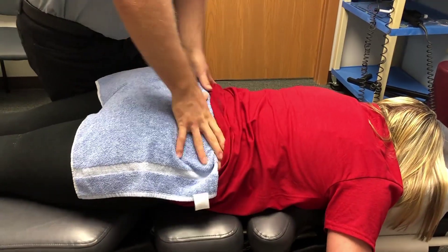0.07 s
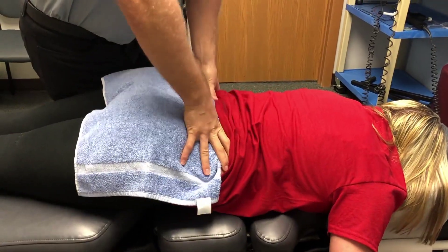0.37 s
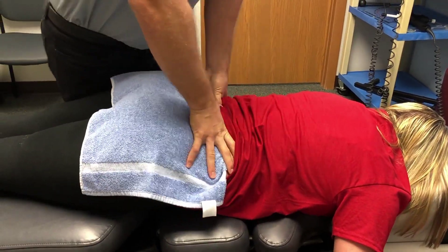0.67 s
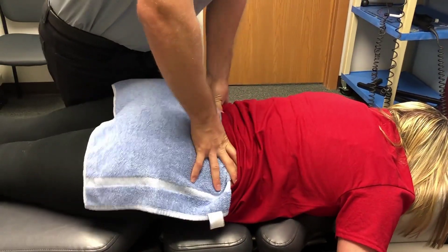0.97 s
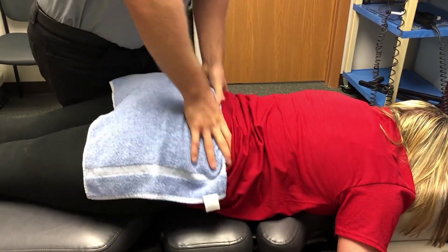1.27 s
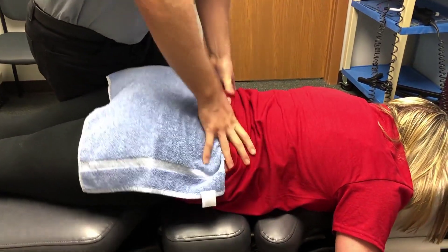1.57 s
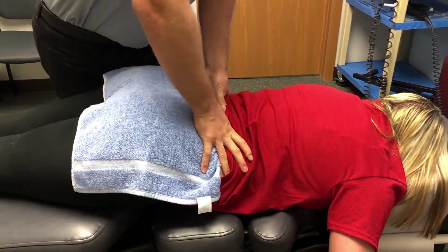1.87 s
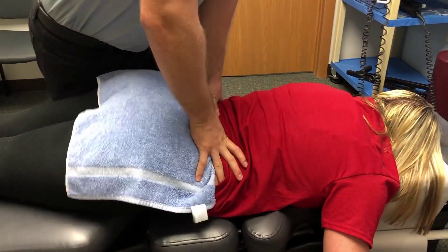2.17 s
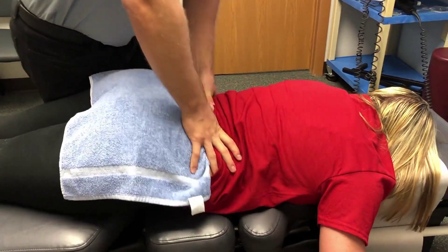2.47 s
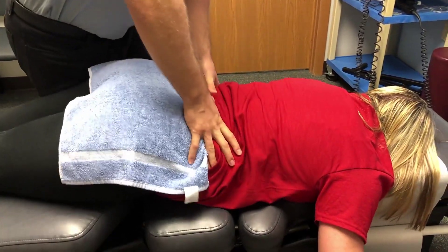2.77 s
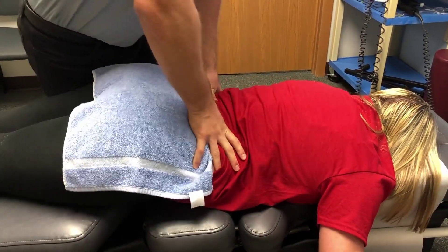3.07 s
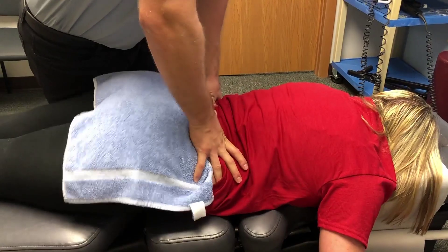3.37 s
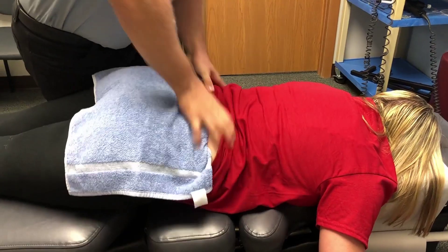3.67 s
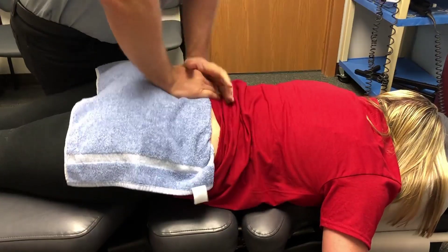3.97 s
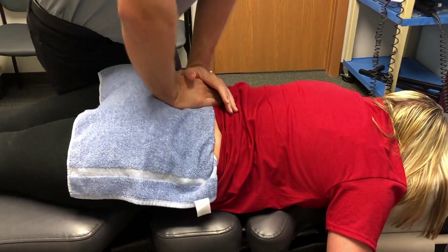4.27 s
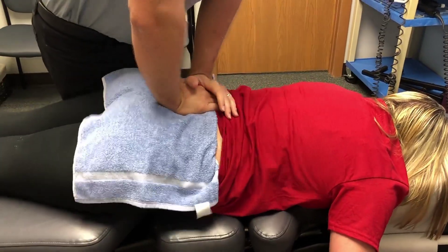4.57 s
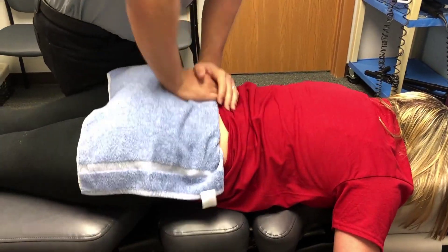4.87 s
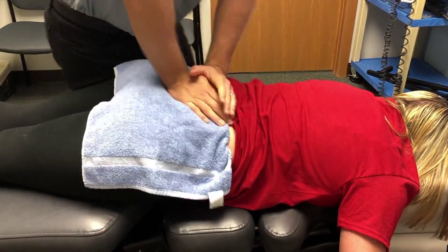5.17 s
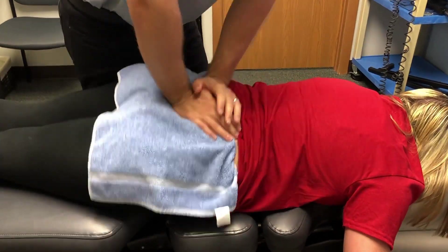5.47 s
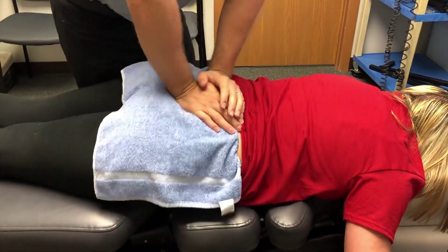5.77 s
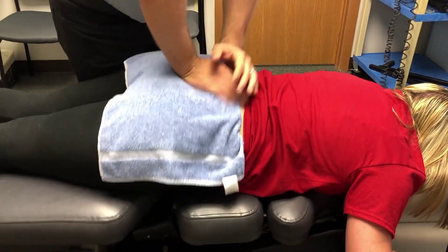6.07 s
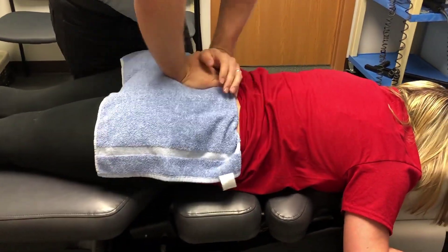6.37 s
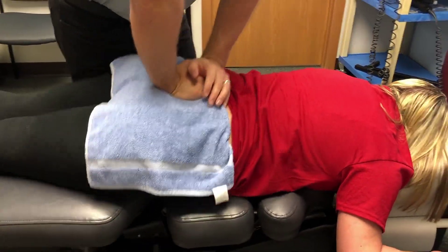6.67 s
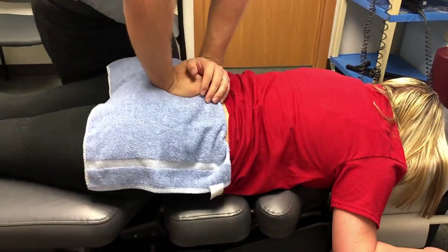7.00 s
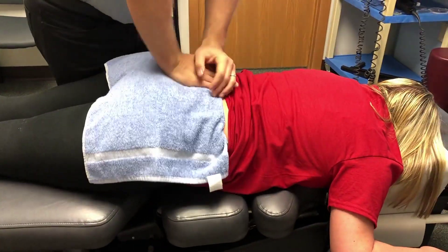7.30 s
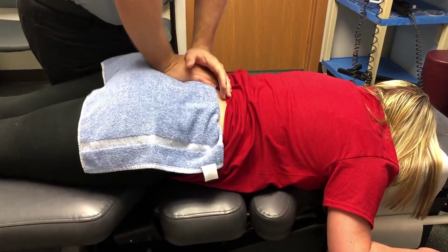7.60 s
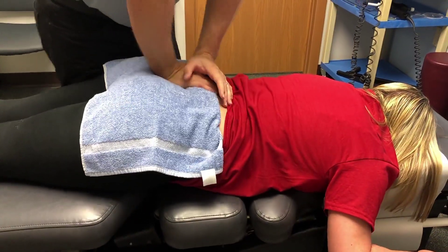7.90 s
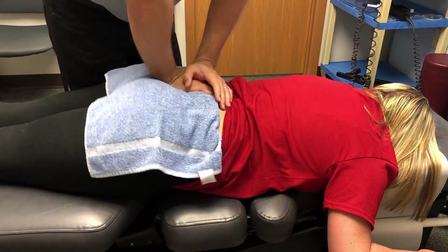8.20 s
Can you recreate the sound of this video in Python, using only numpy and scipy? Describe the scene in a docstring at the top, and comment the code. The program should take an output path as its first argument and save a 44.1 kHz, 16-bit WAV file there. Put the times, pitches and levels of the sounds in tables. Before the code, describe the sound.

In a small quiet office, an air-driven treatment table works seven times, about once a second, close to the microphone. Each time a valve clicks and the padded section knocks up against its stop. Air escapes in a short hiss with falling whistles, then a hand thrust trips the latch and the section drops with a clack and a heavy thud. Light ticks fall between the blows, and ventilation hums faintly.

```python
"""An air-driven drop table works seven times in a small quiet office.
Each time a valve clicks and a piston knocks the padded section up against its stop.
The air hisses out with falling whistles and the piston settles. A thrust of the hands then trips
the latch and the section thuds down on the frame. The controls tick now and then between the blows;
ventilation hums throughout."""
import sys
import numpy as np
from scipy import signal
from scipy.fft import rfft, irfft
from scipy.io import wavfile
from scipy.ndimage import uniform_filter1d, minimum_filter1d

SR = 44100
rng = np.random.default_rng(int(sys.argv[2]) if len(sys.argv) > 2 else 0)


def put_to_file(sound):
    """Save the sound as 16-bit audio at rate SR, in the file named by the first command-line argument."""
    columns = np.atleast_2d(sound).T  # one column per channel
    safe = np.clip(columns, -1, 1)
    whole_steps = np.round(safe * 32767)
    wavfile.write(sys.argv[1], SR, whole_steps.astype(np.int16))


N = 367794
CUTOFF_HZ = 15600
CLOCK_S = np.arange(N) / SR
AGE_S = np.arange(int(.7 * SR)) / SR   # time within one event
RIPPLE = rng.standard_normal(400)   # nearby hard surfaces give all noises the same fine peaks and dips

# piston modes: f/Hz, level/dB, t60/s
PISTON_MODES = [(363, -9, 0.14), (528, 2, 0.037), (998, -2, 0.025), (1280, -13, 0.016), (4240, -23, 0.071)]
# piston clatter spectrum: f/Hz, level/dB
PISTON_SPECTRUM = [(47, -34), (80, -7.5), (145, -2), (250, -16), (365, -1.5), (550, -2.5), (720, -7),
                   (1400, -11.5), (2000, -17.5), (5000, -23.5), (15500, -43)]
# latch and control clatter spectrum: f/Hz, level/dB
LATCH_SPECTRUM = [(30, -16), (100, -19.5), (170, -6.5), (380, -0.5), (700, -2.5), (1300, -10.5),
                  (2200, -11.5), (5200, -13.5), (7000, -16.5), (9500, -21.5), (12000, -24), (15500, -26)]
# spectrum of slow air through the silencer: f/Hz, level/dB
SILENCER_SPECTRUM = [(150, -4), (500, -32), (1500, -10), (3000, -7), (4000, 3.5), (6200, 3), (9300, 1.5),
                     (10200, -14), (11200, -6), (11700, -2), (12600, -17), (15400, -8)]


def raising():
    """The valve clicks; the piston meets the cushion and knocks it up to its stop."""
    # valve t/s, valve treble/dB, piston contact t/s, piston treble/dB, stop t/s
    raises = [(.1094, 1.5, .228, -1, .2845), (1.4706, 3.5, 1.591, .5, 1.6408),
              (2.562, 1.5, 2.6914, 1, 2.7305), (3.7405, 1, 3.8627, .5, 3.920),
              (4.811, 0, 4.9635, 4, 4.9945), (6.0095, -.5, 6.1337, -.5, 6.188),
              (7.371, .5, 7.499, -3.5, 7.5498)]
    # contact modes: f/Hz, level/dB, t60/s
    valve_modes = [(374, 9.5, 0.023), (529, -3, 0.034), (2500, 10, 0.0067), (3256, -7, 0.028),
                   (4470, -1.5, 0.014), (4850, 3, 0.014)]
    stop_modes = [(398, 4.5, 0.04), (694, -10.5, 0.047), (793, -22, 0.19), (917, -4.5, 0.074),
                  (1214, -5.5, 0.053), (1310, -18.5, 0.34), (1590, -5, 0.021), (1580, -17.5, 0.21),
                  (2520, -7.5, .02), (3416, -10, 0.075), (4153, -0.5, 0.026), (4300, -23, 0.1)]
    # clatter spectra: f/Hz, level/dB
    valve_spectrum = [(47, -53.5), (140, -10.5), (180, -13), (360, -1.5), (550, -4.5), (800, -8.5),
                      (1700, -11.5), (2100, -19), (5600, -18.5), (6900, -21.5), (8700, -23.5), (15500, -31)]
    stop_spectrum = [(30, -24), (90, -25.5), (150, -3), (370, -4), (620, -2), (1250, -6), (1650, -9),
                     (2000, -16), (3200, -16.5), (4200, -14.5), (4900, -23.5), (9000, -28.5), (12000, -31),
                     (15500, -39.5)]
    valve_s, valve_treble_db, lift_s, lift_treble_db, stop_s = np.transpose(raises)
    valve = blows(strikes(valve_s, level_db=-14, treble_db=valve_treble_db), valve_spectrum, valve_modes,
                  crack_db=-8.5, crack_s=.0045, crack_treble_db=10, attack_s=.0019,
                  room_db=-5.5, early_db=-11, echo_db=-8, frame_db=-10)
    lift = blows(strikes(lift_s, level_db=-12.3, treble_db=lift_treble_db),
                 PISTON_SPECTRUM, PISTON_MODES,
                 crack_db=-5, crack_s=.005, crack_treble_db=7.5, attack_s=.0017,
                 room_db=-10, early_db=2, echo_db=-10.5, frame_db=-5)
    stop = blows(strikes(stop_s, level_db=-9, treble_db=0), stop_spectrum, stop_modes,
                 crack_db=-15.5, crack_s=.0056, crack_treble_db=19.5, attack_s=.0002,
                 room_db=-2.5, early_db=-5, echo_db=-10.5, frame_db=-2)
    return valve + lift + stop


def dropping(push_lead_s=.026, strain_lead_s=.015, bump_lag_s=.023, full_thud_db=-8):
    """Hands push; the latch strains and trips; a dull bump follows its clack; the section lands."""
    # push/dB, trip t/s, latch/dB, latch treble/dB, bump/dB, landing t/s, landing/dB
    drops = [(-45, .908, -4.5, -.5, -15, 0.95, -12), (-52, 2.205, -11, 1, -17.5, 2.285, -11),
             (-46, 3.305, -8.5, -4.5, -17.5, 3.365, -8.5), (-46, 4.470, -11, .5, -25, 4.490, -11.5),
             (-44, 5.526, -10.5, -6, -24, 5.551, -6.5), (-40, 6.742, -14, -7, -28, 6.744, -6.5),
             (-38, 8.1305, -13.5, 4.5, -10, 8.12, -11)]
    # second latch clack on slow drops: t/s, level/dB
    rebounds = [(2.261, -16.5), (3.374, -10.5)]
    # contact modes: f/Hz, level/dB, t60/s
    latch_modes = [(426, -4, 0.023), (660, -6, .02), (3760, 0.5, 0.028), (4720, 6, 0.011),
                   (5240, 3.5, 0.013), (5600, -15, 0.11)]
    thud_modes = [(147.5, 2.5, 0.073), (249, -3, 0.1), (382, 4, 0.031), (484, 3, 0.023)]
    # thud spectrum: f/Hz, level/dB
    thud_spectrum = [(25, -28), (75, -17.5), (140, -1.5), (200, -2), (370, -2), (600, -7.5), (1200, -13),
                     (2200, -21), (5000, -26), (15500, -34)]
    push_db, trip_s, latch_db, latch_treble_db, bump_db, landing_s, landing_db = np.transpose(drops)
    rebound_s, rebound_db = np.transpose(rebounds)
    contact_s = np.minimum(trip_s, landing_s)
    clacks = np.vstack([strikes(contact_s - strain_lead_s, level_db=-24, treble_db=-8),
                        strikes(trip_s, latch_db, latch_treble_db),
                        strikes(rebound_s, rebound_db, treble_db=-5.5)])
    latch = blows(clacks, LATCH_SPECTRUM, latch_modes,
                  crack_db=-5, crack_s=.0041, crack_treble_db=10, attack_s=.0012,
                  room_db=-4.5, early_db=3.5, echo_db=-11, frame_db=-8.5)
    thud_s = np.r_[contact_s - push_lead_s, trip_s + bump_lag_s, landing_s]
    thud_db = np.r_[push_db, bump_db, landing_db]
    thud_treble_db = .38 * (full_thud_db - thud_db)   # lighter thuds are thinner
    thud = blows(strikes(thud_s, thud_db, thud_treble_db), thud_spectrum, thud_modes,
                 crack_db=-6.5, crack_s=.007, crack_treble_db=-2.5, attack_s=.00046,
                 room_db=-6.5, early_db=2.5, echo_db=-16.5, frame_db=-5, corner_hz=304)
    return latch + thud


def venting():
    """The cylinder empties, its piston settles with a soft knock, a seep lingers."""
    # vent opening t/s, settling delay/s, settling level/dB
    vents = [(.561, .064, -27.5), (1.924, .065, -33), (2.934, .067, -29), (4.192, .046, -27.5),
             (5.202, .059, -28), (6.462, .035, -29.5), (7.823, .029, -33)]
    vent_s, delay_s, settle_db = np.transpose(vents)
    settle = blows(strikes(vent_s + delay_s, settle_db, treble_db=-1), PISTON_SPECTRUM, PISTON_MODES[2:],
                   crack_db=-3, crack_s=.011, crack_treble_db=13, attack_s=.0054,
                   room_db=-2.5, early_db=0, echo_db=-17, frame_db=-1)
    return exhaust(vent_s) + settle + seep(vent_s)


def exhaust(vent_s, level_db=-21.5, hold_s=.08, pressure_s=.16, leak_lead_s=.0078):
    """The valve leaks, then opens; the jet holds, then fades, its whistles falling with the pressure."""
    # air jet spectrum: f/Hz, level/dB
    jet_spectrum = [(47, -24), (150, 13), (350, 2), (600, -7), (950, -7), (1500, -9.5), (2300, 3.5),
                    (3100, 1), (4300, 1.5), (6700, 8), (8700, 7.5), (10500, 3), (13000, 3.5), (15500, 5)]
    track = np.zeros(N)
    flow = rising(.0019) / np.sqrt(1 + (AGE_S / hold_s) ** 3.76) * dying(3.56)
    slack = rising(.23)   # at low pressure only the silencer's colour is left
    lower_hz = 15600 * np.exp(-AGE_S / pressure_s)
    upper_hz = 1.5 * lower_hz
    for start_s in vent_s:
        jet = coloured(rng.standard_normal(len(AGE_S)), jet_spectrum)
        muffled = coloured(rng.standard_normal(len(AGE_S)), SILENCER_SPECTRUM)
        hiss = np.sqrt(1 - slack) * jet + np.sqrt(slack) * muffled
        lower = from_db(-4) * whistle(lower_hz, half_width_hz=300)
        upper = from_db(-9) * whistle(upper_hz, half_width_hz=500) * (upper_hz < CUTOFF_HZ)
        whistles = (lower + upper) * dying(1.7)   # fade faster than the jet
        leak = from_db(-12.5) * jet * rising(.0057) * dying(.51)
        add(track, start_s, from_db(level_db) * flow * (hiss + whistles))
        add(track, start_s - leak_lead_s, from_db(level_db) * leak)
    return track


def whistle(pitch_hz, half_width_hz):
    """Breathy tone: a gliding sine times low-passed noise."""
    lowpass = signal.butter(2, half_width_hz, fs=SR, output="sos")
    waver = signal.sosfilt(lowpass, rng.standard_normal(len(AGE_S)))
    return unit_rms(waver) * np.sin(2 * np.pi * np.cumsum(pitch_hz) / SR)


def seep(vent_s, length_s=.7, level_db=-66.5):
    """Thin hiss of air seeping after each vent opens."""
    is_open = sum((CLOCK_S > start_s) & (CLOCK_S < start_s + length_s) for start_s in vent_s)
    flow = uniform_filter1d(1.0 * is_open, size=2000)
    return from_db(level_db) * flow * coloured(rng.standard_normal(N), SILENCER_SPECTRUM)


def controls():
    """Light ticks of the controls between the heavy blows."""
    # ticks: t/s, level/dB, treble/dB
    ticks = [(1.297, -37.5, -6), (1.3574, -36.5, 11.5), (3.222, -29, -5), (3.6906, -33.5, 10.5),
             (4.725, -43, 0), (5.903, -35, -12), (7.111, -35, -8)]
    # control modes: f/Hz, level/dB, t60/s
    tick_modes = [(2340, 1.5, 0.019), (4740, -6, .015), (7170, -28, 0.17), (11700, -29, 0.16)]
    return blows(ticks, LATCH_SPECTRUM, tick_modes,
                 crack_db=-12.5, crack_s=.0098, crack_treble_db=9, attack_s=.0017,
                 room_db=-12.5, early_db=-8, echo_db=-14, frame_db=-16)


def ventilation(rumble_db=-50.5):
    """Steady air rumble with four fan tones."""
    # fan tones: f/Hz, rms level/dB
    fan_tones = [(58, -55.5), (465, -64), (552, -60), (941, -66)]
    # rumble spectrum: f/Hz, level/dB
    rumble_spectrum = [(25, -20), (40, -21), (56, -3.5), (85, -7.5), (130, -5.5), (220, -8), (340, -7.5),
                       (550, -8.5), (750, -21.5), (940, -17), (1500, -21), (2300, -27.5), (6000, -36.5),
                       (15500, -46)]
    hum = sum(from_db(db) * np.sqrt(2) * np.sin(2 * np.pi * (hz * CLOCK_S + rng.random()))
              for hz, db in fan_tones)
    return from_db(rumble_db) * coloured(rng.standard_normal(N), rumble_spectrum) + hum


def blows(rows, spectrum, modes, crack_db, crack_s, crack_treble_db, attack_s,
          room_db, early_db, echo_db, frame_db, corner_hz=1500, ceiling_s=.022, alike=.58):
    """Each blow: a few ms of chatter, the part's ring, a ceiling echo, then room and frame."""
    # table frame modes: f/Hz, level/dB before weighting by the blow's spectrum, t60/s
    frame_modes = [(62, -9, 0.38), (116, -24, 0.21), (141.24, -7.5, 0.48), (159.3, -15.5, 0.74),
                   (211, -13, 0.68), (251.4, -11.5, 0.59), (334, -10, 0.46), (365.2, -1.5, 0.3),
                   (444.5, -13, 0.51), (494.6, -3.5, 0.27), (545, -23.5, 0.29), (652, -13, 0.34),
                   (720, -37.5, 0.43), (789, -21, 0.37), (944, -8.5, 0.28), (1080, -4.5, 0.27),
                   (1213, -9, 0.32), (1490, -12, 0.19), (1610, -11.5, 0.37), (1816, -13, 0.18)]
    driven_modes = [(hz, db + at_hz(spectrum, hz), t60_s) for hz, db, t60_s in frame_modes]
    track = np.zeros(N)
    signature = rng.standard_normal(len(AGE_S))   # same parts, same spot: blows resemble one another
    # the room fills once the ceiling answers
    filling = np.interp(AGE_S, [.46 * ceiling_s, ceiling_s], [from_db(early_db), 1]) * rising(.0071)
    for start_s, level_db, treble_db in rows:
        white = np.sqrt(alike) * signature + np.sqrt(1 - alike) * rng.standard_normal(len(AGE_S))
        noise = coloured(white, spectrum)
        burst = np.exp(-(AGE_S / crack_s) ** 2) * rising(attack_s)
        crack = from_db(crack_db) * treble_shelf(noise, crack_treble_db) * burst
        contact = crack + ringing(modes, scatter_db=1.5, swell_s=attack_s)
        echo = from_db(echo_db) * np.interp(AGE_S - ceiling_s, AGE_S, contact, left=0)
        room = from_db(room_db) * room_tail(noise) * filling
        frame = from_db(frame_db) * ringing(driven_modes, scatter_db=-1, swell_s=.015)
        blow = treble_shelf(contact + echo + room + frame, treble_db, corner_hz)
        add(track, start_s, from_db(level_db) * blow)
    return track


def ringing(modes, scatter_db, swell_s, swell_cycles=1.16):
    """Decaying sines, low ones slower to build; level and phase vary per blow."""
    return sum(from_db(db + scatter_db * rng.normal()) * np.sin(2 * np.pi * (hz * AGE_S + rng.random()))
               * dying(t60_s) * rising(swell_s + swell_cycles / hz) for hz, db, t60_s in modes)


def room_tail(noise, hollow_db=-27.5, hollow_t60_s=.91):
    """Reflections die band by band, bass last; the hollow table rings on faintly."""
    # room decay: f/Hz, t60/s
    room_decay = [(60, 0.84), (150, 0.37), (350, 0.45), (700, 0.3), (1500, 0.28), (4000, 0.27),
                  (8000, 0.22), (15000, 0.19)]
    spectrum, hz = rfft(noise), np.fft.rfftfreq(len(noise), 1 / SR)
    centres_hz = np.transpose(room_decay)[0]
    walls = np.zeros(len(noise))
    for centre_hz, t60_s in room_decay:
        band = at_hz(np.c_[centres_hz, centres_hz == centre_hz], hz)
        walls += irfft(spectrum * band, len(noise)) * dying(t60_s)
    return walls + from_db(hollow_db) * noise[::-1] * dying(hollow_t60_s)


def strikes(times_s, level_db, treble_db):
    """Rows of t/s, level/dB, treble/dB; a scalar serves every row."""
    return np.transpose(np.broadcast_arrays(times_s, level_db, treble_db))


def coloured(white, spectrum, ripple_db=2.5):
    """Noise shaped to a spectrum, finely rippled, at unit rms."""
    hz = np.fft.rfftfreq(len(white), 1 / SR)
    ripple = np.interp(hz, np.linspace(0, CUTOFF_HZ, len(RIPPLE)), RIPPLE) * np.minimum(hz / 2000, 1)
    gain = from_db(at_hz(spectrum, hz) + ripple_db * ripple) * (hz < CUTOFF_HZ)
    return unit_rms(irfft(rfft(white) * gain, len(white)))


def treble_shelf(x, treble_db, corner_hz=1600):
    """First-order shelf: a harder contact has more treble."""
    low = signal.sosfilt(signal.butter(1, corner_hz, fs=SR, output="sos"), x)
    return low + from_db(treble_db) * (x - low)


def dying(t60_s):
    """Decay of 60 dB per t60_s."""
    return np.exp(-np.log(1000) * AGE_S / t60_s)


def rising(swell_s):
    """Swell from 0 to 1."""
    return 1 - np.exp(-(AGE_S / swell_s) ** 2)


def at_hz(points, hz):
    """Interpolate a table over log frequency."""
    known_hz, values = np.transpose(points)
    return np.interp(np.log(np.maximum(hz, 1)), np.log(known_hz), values)


def from_db(db):
    """Decibels to gain."""
    return 10 ** (np.asarray(db) / 20)


def unit_rms(x):
    """Scale to unit power."""
    return x / np.sqrt(np.mean(x ** 2) + 1e-20)


def add(track, start_s, sound):
    """Mix a sound in at start_s."""
    start = max(round(start_s * SR), 0)
    track[start:start + len(sound)] += sound[:max(N - start, 0)]


def scene():
    """Drop table over the ventilation, mono."""
    return (raising() + venting() + dropping() + controls() + ventilation())[None]


def record(dry, threshold=.66, release_db_per_s=248):
    """Fast peak limiter, then a steep low-pass."""
    over_db = 20 * np.log10(np.maximum(np.abs(dry) / threshold, 1))
    release_db = release_db_per_s * CLOCK_S
    held_db = np.maximum.accumulate(over_db + release_db, axis=-1) - release_db
    gain = uniform_filter1d(minimum_filter1d(from_db(-held_db), size=45), size=45)
    lowpass = signal.ellip(12, .1, 80, CUTOFF_HZ, fs=SR, output="sos")
    return signal.sosfilt(lowpass, dry * gain)


dry = scene()
out = record(dry)
put_to_file(out)
```